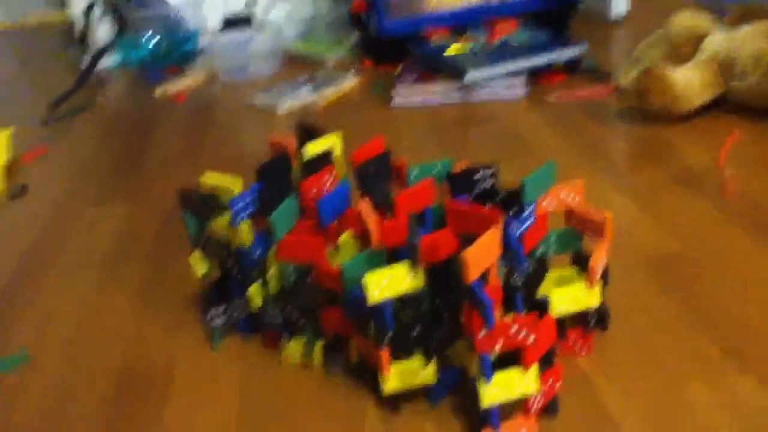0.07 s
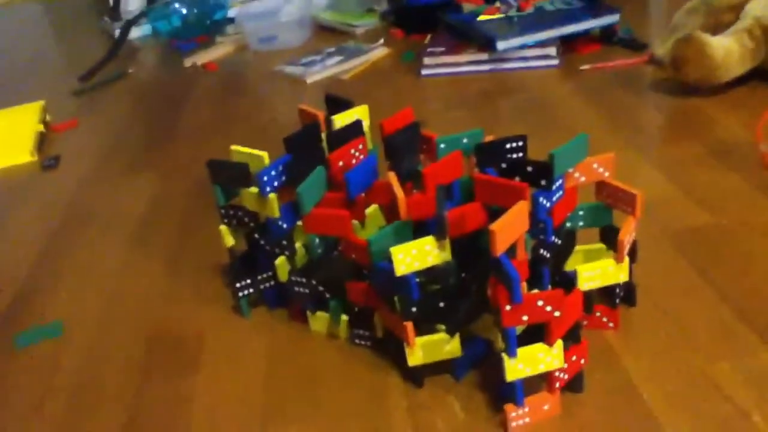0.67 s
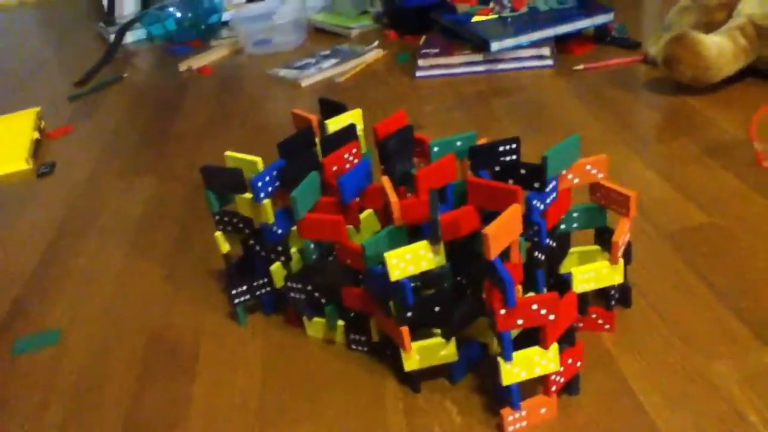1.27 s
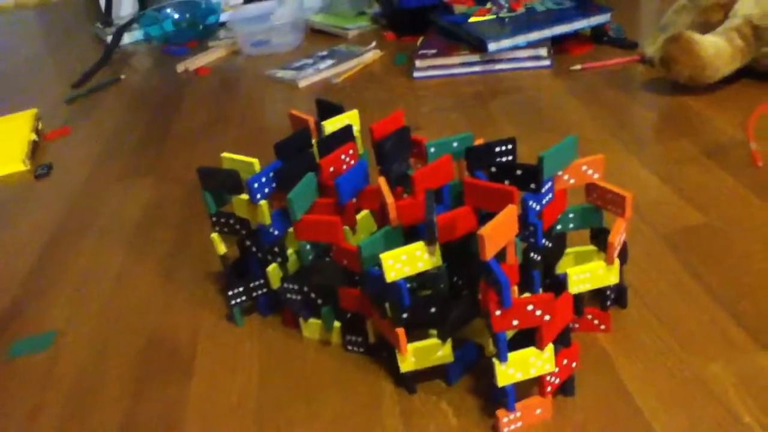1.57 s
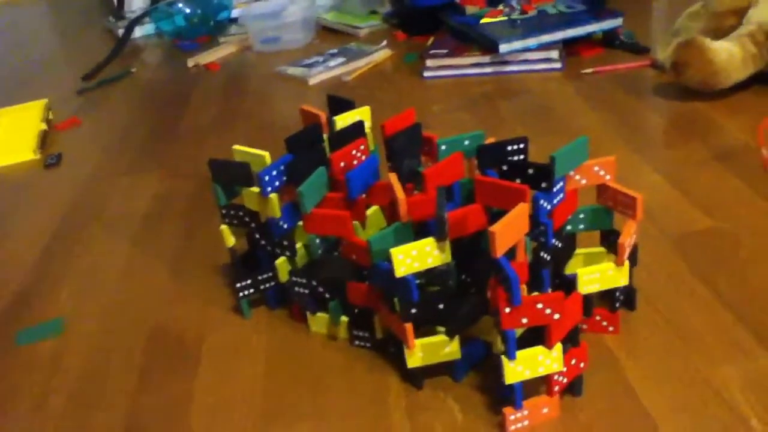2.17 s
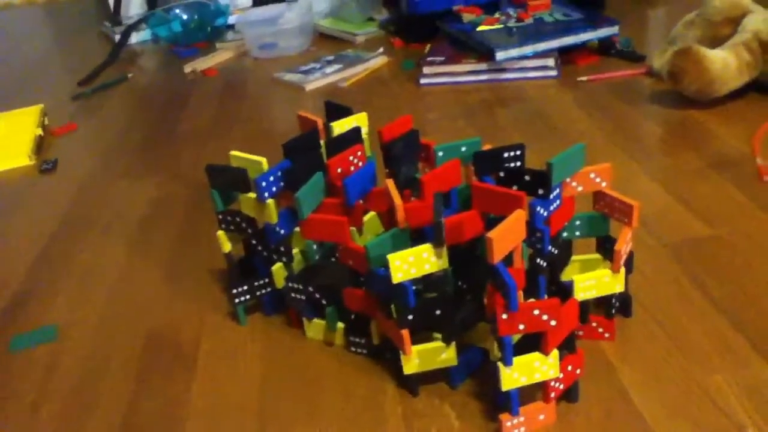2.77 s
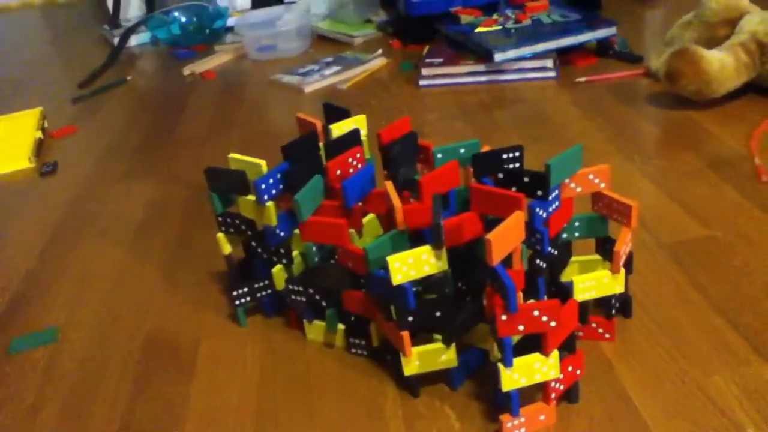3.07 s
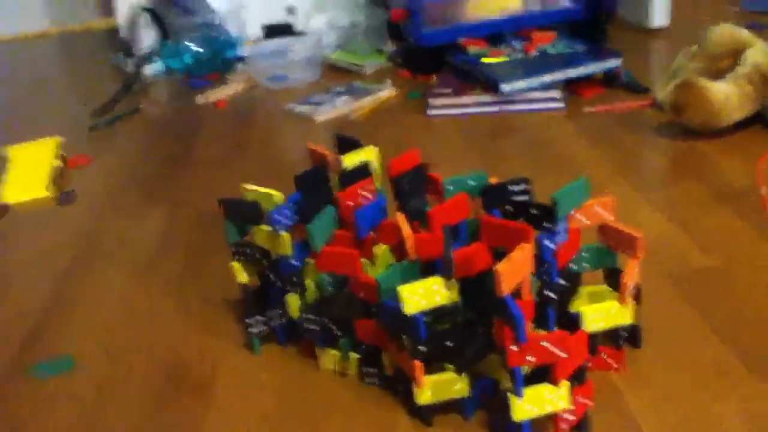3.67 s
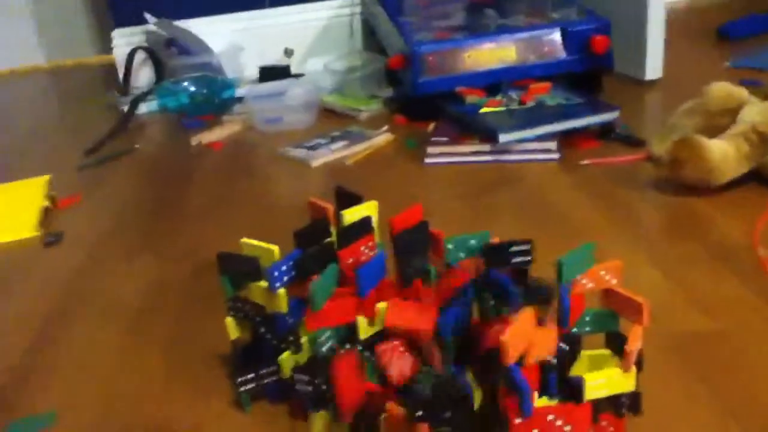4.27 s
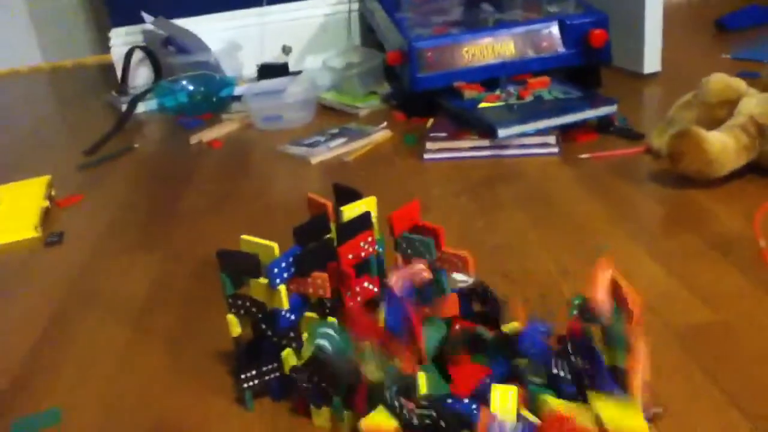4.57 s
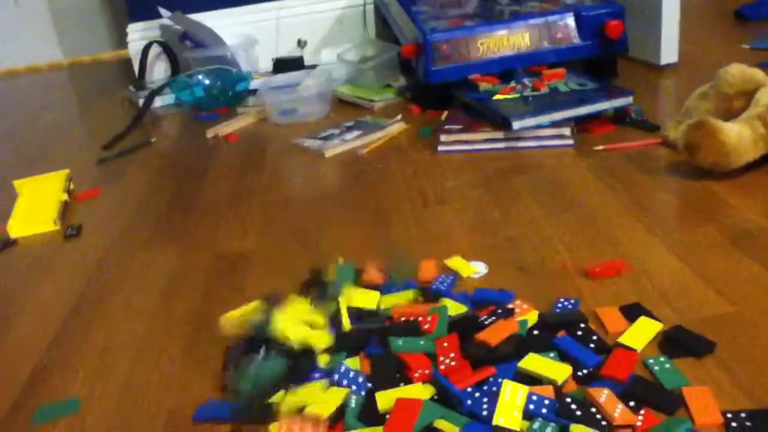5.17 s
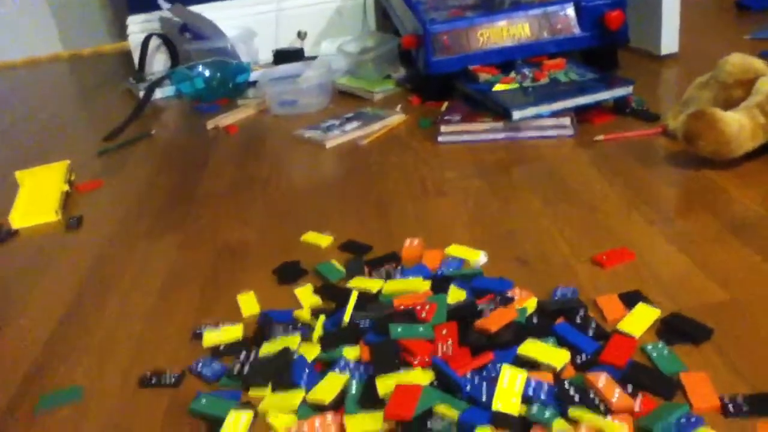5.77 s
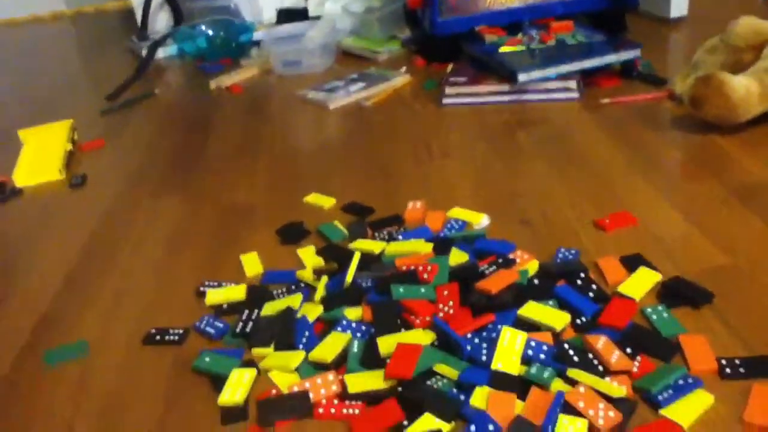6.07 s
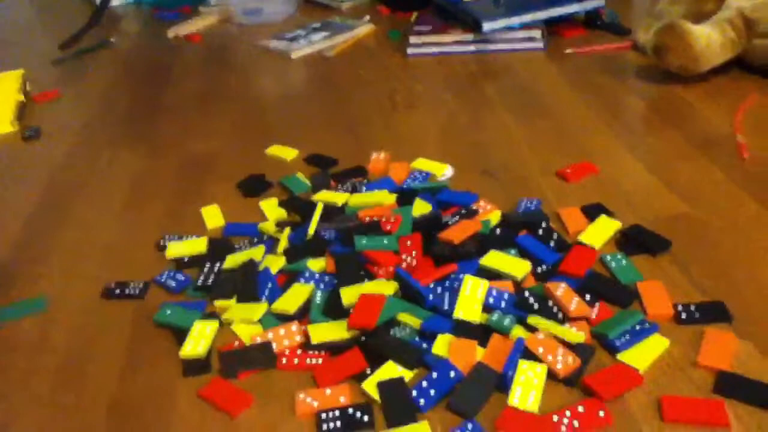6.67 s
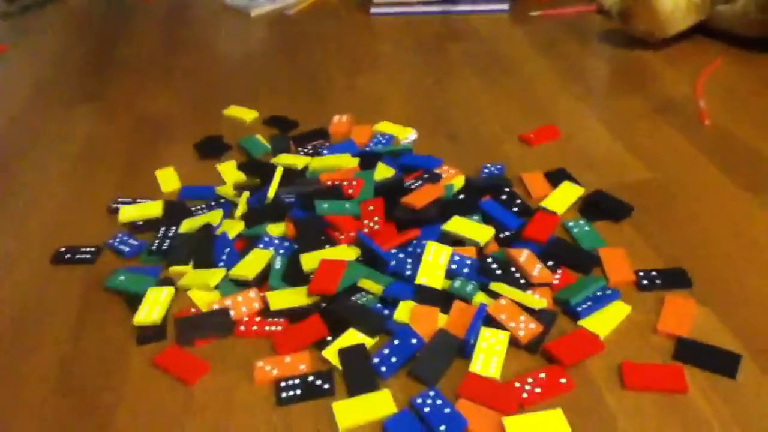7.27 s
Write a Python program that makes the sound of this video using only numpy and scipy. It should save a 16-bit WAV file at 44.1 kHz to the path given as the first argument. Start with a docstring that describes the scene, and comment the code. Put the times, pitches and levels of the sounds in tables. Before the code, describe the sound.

A quiet room, then a tower of plastic dominoes collapses with a dense clatter onto a wooden floor and settles.

```python
"""A small quiet room: hiss, a faint motor hum, and a thin whine and a tick from a hand-held camera.
At 4.1 s a tower of plastic dominoes gives way with a sharp double clack and collapses onto a wooden floor.
Hundreds of tiles clatter against each other and knock on the boards, and the room answers briefly.
Near 6 s, after the pile has settled, a last tile slips, topples and rattles to rest.
The room tone carries on, with one softer tick of the camera case just before the end."""
import sys
import numpy as np
from scipy import signal
from scipy.fft import rfft, irfft
from scipy.io import wavfile
from scipy.ndimage import uniform_filter1d, minimum_filter1d

SR = 44100
rng = np.random.default_rng(int(sys.argv[2]) if len(sys.argv) > 2 else 0)


def generate_wav(signal):
    """Clip the signal to [-1, 1] and save it as 16-bit WAV at the path in sys.argv[1]."""
    frames = np.transpose(np.atleast_2d(signal))
    scaled = np.clip(frames, -1, 1) * 32767
    pcm = np.round(scaled).astype(np.int16)
    wavfile.write(sys.argv[1], SR, pcm)


N = 331191

# single blows that stand out: start_s, click_db, centre_hz, width_octaves, knock_db
ACCENT_HITS = [(4.1445, -14.5, 7040, 0.43, -29.5), (4.1498, -14, 9450, 0.5, -37),
               (4.2113, -26, 8900, 0.62, -49), (4.2534, -33, 7400, .4, -50),
               (4.265, -28, 4500, 0.42, -46.5), (4.2835, -26, 3000, 0.33, -27),
               (4.3013, -23, 3580, 0.65, -26.5), (4.3282, -23.5, 5900, .52, -33.5),
               (4.3387, -27, 2300, 0.51, -22), (4.3598, -24, 5300, .42, -34), (4.3725, -18, 4140, .61, -35),
               (4.3875, -24, 6600, .47, -36.5), (4.4008, -19.5, 8000, .2, -35.5),
               (4.4163, -16, 5370, .46, -26), (4.4737, -18, 5110, .48, -29),
               (4.5017, -16.5, 4800, .3, -29.5), (4.521, -17, 3820, .24, -30.5),
               (4.5437, -15, 7200, 0.44, -41), (4.5648, -15, 5400, 0.57, -31.5),
               (4.593, -15, 5000, 0.55, -32.5), (4.6786, -12.5, 5600, 0.25, -45.5),
               (4.8599, -20, 6500, 0.59, -30.5), (4.8964, -16, 6300, 0.45, -42),
               (4.96, -16, 6200, 0.36, -43), (4.9812, -19, 6500, 0.49, -40), (5.138, -17, 7200, 0.45, -29),
               (5.1906, -15, 7300, 0.43, -28.5), (5.2389, -17.5, 6070, 0.84, -34),
               (5.3841, -18, 6360, 0.42, -38), (5.5148, -23, 8000, .55, -48),
               (5.6203, -29.5, 8200, .43, -34), (5.6736, -28, 8300, .44, -45),
               (5.695, -33, 6700, 0.37, -55), (5.722, -27.5, 6600, 0.49, -48),
               (5.7575, -32, 7700, 0.34, -46), (5.9183, -47, 2640, .4, -53), (5.985, -27.5, 3140, .8, -43),
               (5.999, -25, 4150, 1, -37)]
# the near side falls, the far side follows, the pile settles: time_s, tile_on_tile_db, tile_on_floor_db
COLLAPSE_ENVELOPE = [(4.25, -58, -53), (4.3, -40, -35), (4.4, -34, -38), (4.48, -24.5, -29.5),
                     (4.6, -18, -31), (4.69, -21.5, -34.5), (4.76, -17, -32.5), (4.92, -24.5, -36.5),
                     (5, -19, -32), (5.12, -21, -30.5), (5.18, -25, -35), (5.25, -22, -31),
                     (5.36, -21.5, -31.5), (5.56, -29, -40.5), (5.65, -37.5, -46), (5.76, -40.5, -51.5),
                     (5.8, -70, -71)]
# whole slabs land dully at first, loose tiles clink near the end: time_s, tilt_db_per_octave
COLLAPSE_TILT = [(4.35, -6), (4.5, -1.3), (4.65, .5), (4.76, 2.5), (5, 0.8), (5.4, 0.5), (5.55, 5),
                 (5.75, -3.5)]
# tone colour of tiles striking each other: frequency_hz, level_db
PILE_SPECTRUM = [(250, -50.5), (900, -25), (1600, -9.5), (2200, 0), (2800, -1.5), (3250, 4.5), (4100, 3.5),
                 (4900, 1), (6200, 1), (7200, -1), (8600, 2.5), (10200, -1), (12000, -5.5), (16000, -13.5)]
# tone colour of the floorboards: frequency_hz, level_db
BOARD_SPECTRUM = [(35, -54), (90, -36), (170, -18), (260, -6.5), (345, 3.5), (440, -4), (510, -12),
                  (610, 2), (760, -1), (900, 2), (1250, 2.5), (1700, -3.5), (2600, -7.5), (5000, -50.5)]
# the ring of one tile, relative to the touch that starts it: pitch_hz, level_db, t60_s
TILE_MODES = [(3400, -39, .013), (4000, -39, .012), (6050, -37, .01), (8300, -33, .01), (11300, -34, .008)]
# reverb send of the single blows; those farther off wake more of the room: time_s, send_db
REVERB_SEND = [(4.15, -9), (4.4, -14), (5, -7), (5.7, -11.5), (6, -8)]
# reverb decay of the room: frequency_hz, t60_s
ROOM_DECAY = [(200, .5), (1500, .48), (6000, .44), (15000, .32)]
# light ticks of the camera case: start_s, level_db
CASE_TICKS = [(1.4087, -34.5), (7.3245, -47)]
# the ring of the camera case: pitch_hz, level_db, t60_s
CASE_MODES = [(900, -29, .008), (1390, 1, 0.0084), (3200, -6.5, 0.0099)]
# motor hum before and after the camera moves: shaft_multiple, before_db, after_db
MOTOR_HARMONICS = [(2, -87, -75), (3, -87, -78), (4, -70, -71), (6, -73, -65), (7, -63.5, -64),
                   (8, -71.5, -63.5), (9, -74.5, -87.5), (10, -73, -62.5), (11, -78, -82), (12, -81, -70.5)]
# tone colour of the still room and the microphone hiss: frequency_hz, level_db
ROOM_TONE_SPECTRUM = [(20, -25), (36, -13.5), (48, -1.5), (110, 2.5), (200, 2), (300, -3), (420, -6.5),
                      (620, -13), (1000, -18), (2000, -20), (5000, -21.5), (10000, -22.5), (14000, -26.5),
                      (16000, -19.5)]
# faders for the low and high parts of the room tone: time_s, rumble_db, hiss_db
ROOM_TONE_FADERS = [(0, -54.5, -53), (3.2, -55.5, -54), (4.1, -56.5, -53.5), (4.2, -60, -55),
                    (6.3, -58.5, -57), (6.9, -56, -55.5), (7.3, -52.5, -55.5), (7.51, -54, -54.5)]

HIT_SAMPLES = 2048  # length of one click or knock
HIT_BINS_HZ = np.fft.rfftfreq(HIT_SAMPLES, 1 / SR)
TIME_S = np.arange(N) / SR


def collapse(peak_clicks_per_s=3000, peak_knocks_per_s=900, trim_db=-1, band_count=72, floor_spots=36):
    """The mass of falling tiles: the louder it gets, the more of them collide and land on the boards."""
    span = slice(round(4.2 * SR), round(5.9 * SR))
    t = TIME_S[span]
    surge_db = 2 * surges(t)
    tile_db, floor_db = (curve[span] + surge_db for curve in envelopes(COLLAPSE_ENVELOPE))
    tilt = envelopes(COLLAPSE_TILT)[0][span]
    density = gain_of((tile_db - tile_db.max()) / 2)
    # each kind of contact has its own band; together they make the colour of the pile
    centres_hz = np.geomspace(2200, 13000, band_count)
    bands = np.array([gain_of(strike_band_db(hz, octaves=.45)) for hz in centres_hz])
    bands *= gain_of(value_at(PILE_SPECTRUM, HIT_BINS_HZ)) / np.linalg.norm(bands, axis=0)
    shares = np.linalg.norm(bands, axis=1) / np.linalg.norm(bands)
    clatter = np.zeros(len(t) + HIT_SAMPLES - 1)
    for hz, band, share in zip(centres_hz, bands, shares):
        force = share * gain_of(tile_db + trim_db + tilt * np.log2(hz / 6000))
        blows = force * collisions(density * peak_clicks_per_s / band_count, spread_db=3)
        clatter += signal.oaconvolve(blows, tile_click(20 * np.log10(band)))
    for _ in range(floor_spots):
        landings = collisions(density * peak_knocks_per_s / floor_spots, spread_db=2.5)
        blows = gain_of(floor_db + trim_db) * landings
        clatter += signal.oaconvolve(blows, board_knock()) / np.sqrt(floor_spots)
    out = np.zeros(N)
    mix_in(out, t[0], clatter)
    return out


def surges(t, fastest_hz=30, count=24):
    """The tiles come down in clumps: quick random swells between -1 and 1."""
    rates_hz = fastest_hz * np.geomspace(1 / 4, 1, count)
    swells = sum(np.sin(2 * np.pi * (hz * t + rng.random())) for hz in rates_hz)
    return np.tanh(unit_rms(swells))


def collisions(per_s, spread_db):
    """Random impulses of uneven force, with a mean power of 1 at any rate."""
    chance, n = per_s / SR, len(per_s)
    force = unit_rms(gain_of(spread_db * np.minimum(rng.exponential(1, n), 3)))
    polarity = rng.choice([-1, 1], n)
    struck = rng.random(n) < chance
    return force * polarity * struck / np.sqrt(chance)


def clacks(level_window_s=.003):
    """The separate blows, on two stems: the click of plastic and the knock of wood."""
    plastic, wood = np.zeros((2, N))
    for start_s, click_db, hz, octaves, knock_db in [*ACCENT_HITS, *last_tile_rattle(), *corner_hits()]:
        mix_in(plastic, start_s, gain_of(click_db) * tile_click(strike_band_db(hz, octaves)))
        mix_in(wood, start_s, gain_of(knock_db) * board_knock())
    scale = np.sqrt(level_window_s * SR)  # a blow carries the energy of its level held this long
    return scale * plastic, scale * wood


def corner_hits(start_s=4.33, end_s=5.72, per_s=24, centre_hz=6200, octaves=.51, wood_offset_db=-16.5):
    """Tiles that hit corner first and poke out of the mass, as rows like ACCENT_HITS."""
    slots_s = np.arange(start_s, end_s, 1 / per_s)
    late, force, pitch = rng.uniform(-1, 1, (len(slots_s), 3)).T
    times_s = slots_s + .5 * late / per_s
    envelope_s, mass_db, _ = np.transpose(COLLAPSE_ENVELOPE)
    levels_db = np.interp(times_s, envelope_s, mass_db) + 2 * force
    centres_hz = centre_hz * 2 ** (.19 * pitch)
    return [(s, db, hz, octaves, db + wood_offset_db) for s, db, hz in zip(times_s, levels_db, centres_hz)]


def tile_click(colour_db, detune=.1):
    """A tile is struck and rings for a moment; no two tiles are tuned quite alike."""
    body = signal.unit_impulse(HIT_SAMPLES) + ring(TILE_MODES, 1 + detune * rng.standard_normal())
    touch = contact(chatter_s=.0011, chatter_db=10)
    click = equalise(signal.fftconvolve(touch, body)[:HIT_SAMPLES], colour_db)
    return click / np.linalg.norm(click)


def board_knock(fast_hz=2200):
    """A tile lands and sends a bending wave through the boards; its slow low notes arrive last."""
    thud = equalise(contact(chatter_s=.0073, chatter_db=-4), value_at(BOARD_SPECTRUM, HIT_BINS_HZ))
    travel_s = .004 * rng.uniform(.4, 1.3)
    delay_s = travel_s * np.maximum(np.sqrt(fast_hz / (HIT_BINS_HZ + 100)) - 1, 0)
    lag_turns = np.cumsum(delay_s) * HIT_BINS_HZ[1]
    knock = irfft(rfft(thud) * np.exp(-2j * np.pi * lag_turns), HIT_SAMPLES)
    return knock / np.linalg.norm(knock)


def contact(chatter_s, chatter_db):
    """One hard touch, followed by the brief chatter of two faces settling."""
    chatter = rng.standard_normal(HIT_SAMPLES) * np.exp(-TIME_S[:HIT_SAMPLES] / chatter_s)
    return signal.unit_impulse(HIT_SAMPLES) + gain_of(chatter_db) * chatter / np.linalg.norm(chatter)


def strike_band_db(centre_hz, octaves, skirt=2.9, top_widths=2.4, bass_hz=1100):
    """The band that a blow excites: high for a hard corner, low for a flat face."""
    hz = HIT_BINS_HZ + 1
    widths_away = np.log2(hz / centre_hz) / max(octaves, .15)
    band_loss = hz / centre_hz * (1 + widths_away ** 2 / (2 * skirt)) ** skirt
    top_loss = 1 + np.exp(5 * (widths_away - top_widths))  # the contact time cuts off the top
    bass_loss = 1 + (bass_hz / hz) ** 4  # so small a tile radiates no bass
    return -10 * np.log10(band_loss * top_loss * bass_loss)


def last_tile_slide(start_s=5.918, end_s=5.985, level_db=-57, slips_per_s=1200):
    """The last tile slips down the pile in tiny jerks, which also stir the boards."""
    sliding = (TIME_S > start_s) & (TIME_S < end_s)
    slips = collisions(np.full(N, slips_per_s), spread_db=-6) * sliding
    scrape = tile_click(strike_band_db(centre_hz=2000, octaves=.98, top_widths=.98))
    jerk = gain_of(level_db) * (scrape + board_knock())
    return signal.oaconvolve(slips, jerk)[:N]


def last_tile_rattle(start_s=6.0145, gap_s=.02, shrink=.82, count=7, centre_hz=5010, octaves=.58):
    """The last tile bounces unevenly to rest, quicker and weaker, as rows like ACCENT_HITS."""
    bounce = np.arange(count)
    gaps_s = gap_s * shrink ** bounce[:-1] * (1 + .3 * rng.uniform(-1, 1, count - 1))
    times_s = start_s + np.concatenate([[0], np.cumsum(gaps_s)])
    levels_db = -37.5 - 1.5 * bounce
    return [(s, db, centre_hz, octaves, db - 7) for s, db in zip(times_s, levels_db)]


def room_reverb(send, predelay_s=.002, build_s=.0035, reflections_per_s=6000, dwell_s=.004, spots=7):
    """Sparse reflections, each band dying at its own speed; each spot in the room has its own set."""
    t = np.arange(SR // 2) / SR
    onset = 1 - np.exp(-np.maximum(t - predelay_s, 0) / build_s)
    turn = TIME_S / dwell_s
    out = np.zeros(N)
    for spot in range(spots):
        reflections = onset * rng.standard_normal(len(t)) * (rng.random(len(t)) < reflections_per_s / SR)
        hz, age_s, spectra = signal.stft(reflections, SR, nperseg=256)
        decay = gain_of(-60 * age_s / value_at(ROOM_DECAY, hz)[:, None])
        tail = signal.istft(spectra * decay, SR, nperseg=256)[1]
        share = np.sin(np.pi / 2 * np.minimum((turn - spot) % spots, 2))  # equal-power crossfade
        out += signal.oaconvolve(send * share, tail / np.linalg.norm(tail))[:N]
    return out


def camera_noise(whine_hz=14993, whine_db=-75.5):
    """A thin electronic whine, and dry ticks of the case right at the microphone."""
    out = gain_of(whine_db) * unit_rms(np.sin(2 * np.pi * whine_hz * TIME_S))
    for start_s, level_db in CASE_TICKS:
        mix_in(out, start_s, -gain_of(level_db) * ring(CASE_MODES))
    return out


def motor_hum(shaft_hz=28.6, waver_db=2, waver_turns=.082):
    """A distant motor; its harmonics change balance as the microphone moves through standing waves."""
    moved = np.interp(TIME_S, [4.2, 6.1], [0, 1])
    out = np.zeros(N)
    for multiple, before_db, after_db in MOTOR_HARMONICS:
        tone = np.sin(2 * np.pi * (round(multiple) * shaft_hz * TIME_S + waver_turns * drift()))
        level_db = before_db + moved * (after_db - before_db) + waver_db * drift()
        out += np.sqrt(2) * gain_of(level_db) * tone
    return out


def room_tone(crossover_hz=600):
    """The bed: low room rumble under smooth microphone hiss."""
    hz = np.fft.rfftfreq(N, 1 / SR)
    colour = gain_of(value_at(ROOM_TONE_SPECTRUM, hz))
    noise = unit_rms(irfft(rfft(rng.standard_normal(N)) * colour, N))
    rumble = irfft(rfft(noise) / (1 + (hz / crossover_hz) ** 4), N)
    rumble_db, hiss_db = envelopes(ROOM_TONE_FADERS)
    return gain_of(rumble_db) * rumble + gain_of(hiss_db) * (noise - rumble)


def drift(count=12):
    """A slow random wander with an rms of 1."""
    t = np.linspace(0, N / SR, N // 256)
    rates_hz = np.geomspace(.2, 3, count)
    wander = sum(np.sin(2 * np.pi * (hz * t + rng.random())) / np.sqrt(hz) for hz in rates_hz)
    return np.interp(TIME_S, t, unit_rms(wander))


def ring(modes, tuning=1):
    """The modes of a struck body, as dying sines."""
    t = TIME_S[:HIT_SAMPLES]
    return sum(gain_of(db - 60 * t / t60) * np.sin(2 * np.pi * hz * tuning * t) for hz, db, t60 in modes)


def equalise(hit, curve_db):
    """Minimum-phase EQ, which keeps the attack sharp."""
    log_gain = np.log(gain_of(np.maximum(curve_db, curve_db.max() - 80)))
    mirrored = np.concatenate([log_gain, log_gain[-2:0:-1]])
    response = np.fft.ifft(np.exp(np.conj(signal.hilbert(mirrored)))).real
    return signal.fftconvolve(hit, response)[:HIT_SAMPLES]


def value_at(table, hz):
    """Reads a table along straight lines on a log frequency axis."""
    points_hz, values = np.transpose(table)
    return np.interp(np.log(hz + 1), np.log(points_hz), values)


def envelopes(table):
    """The columns of a time table, as sample-by-sample automation."""
    times_s, *columns = np.transpose(table)
    return [np.interp(TIME_S, times_s, column) for column in columns]


def mix_in(track, start_s, sound):
    part = track[round(start_s * SR):][:len(sound)]
    part += sound[:len(part)]


def gain_of(db):
    return 10 ** (np.asarray(db) / 20)


def unit_rms(x):
    return x / np.sqrt(np.mean(x ** 2) + 1e-20)


def scene(mass_send_db=-5, wood_boost_db=4):
    """The dominoes and their reverb over the steady sounds of the room, in mono."""
    plastic, wood = clacks()
    mass = collapse() + last_tile_slide()
    send_db, = envelopes(REVERB_SEND)
    blows = plastic + gain_of(wood_boost_db) * wood  # the wide floor feeds the room more than a tile does
    reverb = room_reverb(gain_of(send_db) * blows + gain_of(mass_send_db) * mass)
    return (plastic + wood + mass + reverb + camera_noise() + room_tone() + motor_hum())[None]


def record(dry, threshold=.72, release_db_per_s=120, attack_samples=45, cutoff_hz=16100):
    """The camera's limiter ducks the sharpest peaks and soon recovers; a low-pass trims the very top."""
    over_db = 20 * np.log10(np.maximum(abs(dry[0]) / threshold, 1))
    release_db = TIME_S * release_db_per_s
    cut_db = np.maximum.accumulate(over_db + release_db) - release_db
    held_gain = minimum_filter1d(gain_of(-cut_db), size=attack_samples)
    gain = uniform_filter1d(held_gain, size=attack_samples)
    low_pass = signal.firwin(511, cutoff_hz, window=("kaiser", 9), fs=SR)
    return signal.oaconvolve(dry * gain, low_pass[None], "same")


dry = scene()
out = record(dry)
generate_wav(out)
```